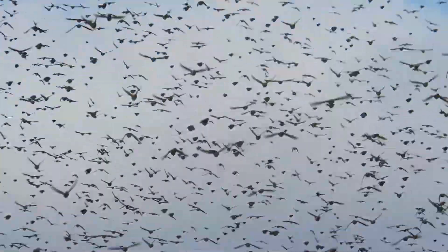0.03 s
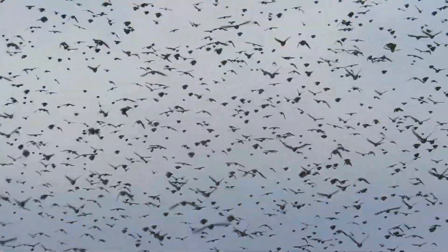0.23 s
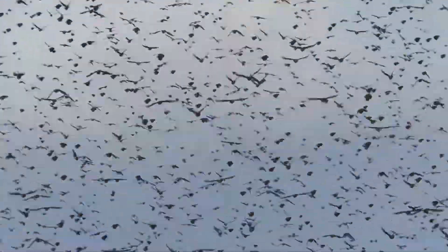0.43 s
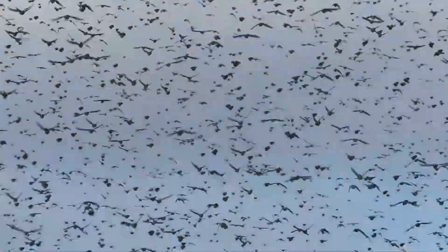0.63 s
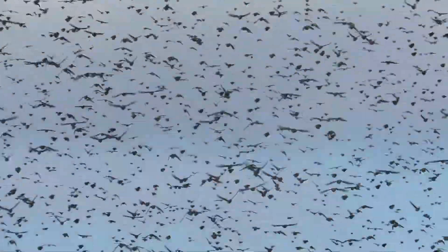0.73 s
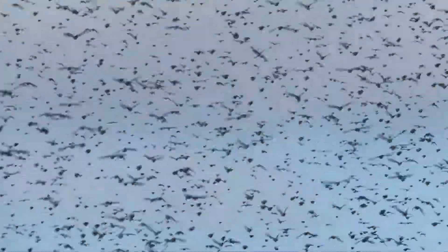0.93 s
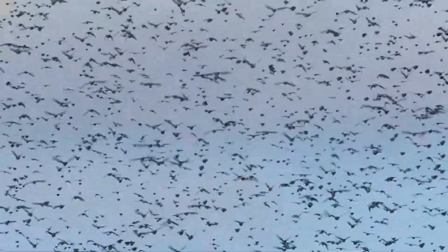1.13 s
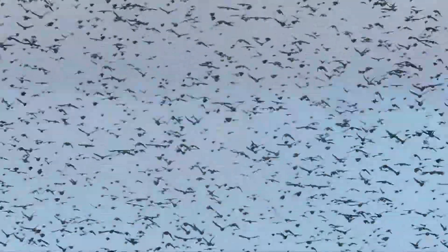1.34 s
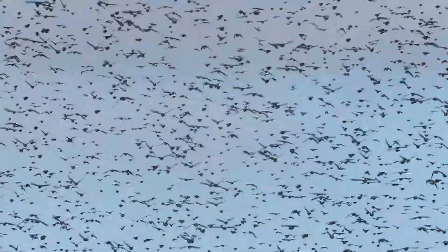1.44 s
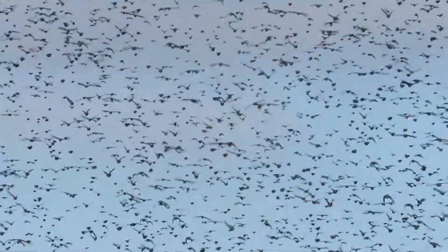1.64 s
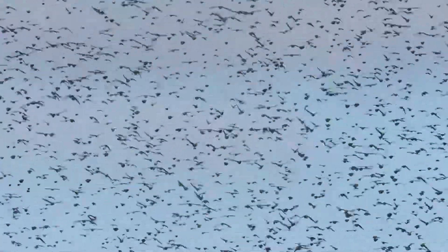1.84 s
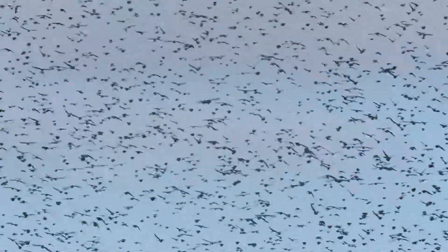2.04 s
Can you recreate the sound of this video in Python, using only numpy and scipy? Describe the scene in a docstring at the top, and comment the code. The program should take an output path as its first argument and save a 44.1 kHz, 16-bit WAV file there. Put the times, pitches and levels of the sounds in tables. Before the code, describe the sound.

Countless bird wings make a continuous rush in the open sky. Wind buffets the microphone almost at once and hits hardest midway. Thin, faint chirps and several close wing swishes come through before the wind dies down.

```python
"""A huge flock of starlings streams overhead, its countless wings blending into a soft rush.
Almost at once, gusts of wind start to rumble and thump on the microphone's two openings (ports).
From 0.65 s come three thin chirps, and from 0.8 s five airy swishes pass close by.
Near 1 s the hardest thumps make the limiter turn everything down, and the level creeps back.
A small tick sounds in the fourth swish; then the wind dies away while the flock rushes on."""
import sys
import numpy as np
from scipy import signal
from scipy.fft import rfft, irfft
from scipy.io import wavfile
from scipy.ndimage import uniform_filter1d

SR = 44100
rng = np.random.default_rng(int(sys.argv[2]) if len(sys.argv) > 2 else 0)


def unload_audio(sound):
    """Save the sound as a 16-bit wav file, at the path given as the first command line argument."""
    columns = np.transpose(np.atleast_2d(sound))
    # keep every value between -1 and 1, then stretch to whole-number steps
    steps = np.round(np.clip(columns, -1, 1) * 32767)
    wavfile.write(sys.argv[1], SR, steps.astype(np.int16))


N = 92610
T = np.arange(N) / SR

# Tone colour of all the wings together: pitch_hz, level_db
RUSH_COLOUR = [(25, -18), (85, 8.5), (200, 2), (400, -12.5), (600, -4), (750, -2), (930, 1), (1080, -6.5),
               (1250, -10.5), (1700, -15), (2500, -21), (3500, -17.5), (4300, -25), (5200, -28.5),
               (8000, -34.5), (11000, -39.5), (14000, -51)]
# How alike left and right are in the rush (1 same, 0 unrelated, -1 opposite): pitch_hz, likeness
RUSH_LIKENESS = [(60, 1), (200, 0.95), (380, .45), (700, .85), (1100, .92), (1700, 0.74), (2600, 0.29),
                 (5000, 0.038), (12000, 0)]
# How the rush changes: time_s, level_db, extra_treble_db, extra_bass_db
RUSH_CHANGES = [(0, -42.5, 0, -5), (.25, -46, 2.5, 1.5), (.5, -43.5, 1.5, 5), (0.898, -42.5, 0.5, 0.5),
                (1.2, -42, 0, -0.5), (1.599, -44, 2, -5.5), (1.9, -41.5, -1, 0), (2.1, -42, 0, -4.5)]
# Close swishes: peak_s, level_db, rise_s, fall_s, brightness_db_per_octave
CLOSE_SWISHES = [(.785, -48.5, 0.036, 0.022, -7), (.955, -44, 0.03, 0.023, 0),
                 (1.157, -40, 0.025, 0.028, 0), (1.37, -39.5, 0.046, .033, 0),
                 (1.555, -41.5, 0.046, 0.024, -2.5)]
# Tone colour of a swish: pitch_hz, level_db
SWISH_COLOUR = [(60, -59.5), (300, -31.5), (900, -3), (1400, 3.5), (1700, 0), (1980, 3.5), (2300, 2.5),
                (2800, -10), (3600, -9), (4500, -20.5), (6500, -27), (14000, -53.5)]
# How alike left and right are in a swish: pitch_hz, likeness
SWISH_LIKENESS = [(1000, .95), (2000, 0.87), (3000, 0.81), (5000, .3)]
# Wind at the microphone: time_s, level_db, rumble_centre_hz
WIND_GUSTS = [(0, -55, 200), (.13, -57, 183), (.18, -30.5, 160), (0.213, -44, 167), (0.248, -13, 227),
              (0.301, -12.5, 270), (.335, -19, 231.6), (0.359, -46.5, 220), (0.442, -35.5, 180),
              (0.462, -19.5, 245), (0.489, -17, 246), (0.514, -37.5, 200), (.55, -18.5, 181),
              (0.578, -32.5, 200), (.64, -30, 200), (0.682, -25, 245), (0.704, -51, 170),
              (0.729, -34.5, 191), (0.748, -16.5, 259), (0.809, -17.5, 180), (.845, -23.5, 170),
              (.885, -17, 180), (0.916, -14, 175), (.94, -27, 165), (.98, -15.5, 230), (1.02, -13, 263),
              (1.054, -3.5, 304), (1.086, -15, 310), (1.104, -3, 370), (1.128, -19, 284),
              (1.155, -17.5, 263), (1.2, -36, 220), (1.272, -32.5, 250), (1.36, -31, 260), (1.39, -39, 220),
              (1.42, -29.5, 197), (1.469, -26, 300), (1.5, -32.5, 288), (1.538, -27.5, 240),
              (1.61, -35.5, 238), (1.69, -31, 209), (1.772, -33, 176), (1.818, -48.5, 187),
              (1.93, -45, 206.3), (2.01, -53, 179), (2.069, -24, 172), (2.1, -46, 160)]
# Tone colour of the rumble when centred on RUMBLE_CENTRE_HZ: pitch_hz, level_db
RUMBLE_COLOUR = [(25, -34), (55, -28), (90, -12.5), (140, -1), (210, 5), (320, -1), (450, -4), (700, -17.5),
                 (1000, -38), (1600, -44.5), (4000, -65), (16000, -93.5)]
RUMBLE_CENTRE_HZ = 255.7
# How the ports boost or cut the wind: pitch_hz, gain_db
PORT_COLOUR = [(25, -18), (55, -2), (120, 0.5), (300, 0.5), (450, 4), (550, -4.5), (640, 0.5), (1000, 0.5),
               (1600, -5)]
# How alike left and right are in the wind: pitch_hz, likeness
WIND_LIKENESS = [(40, 0.8), (100, 0.98), (170, 0.43), (260, -0.093), (500, -0.53), (780, -0.61),
                 (1200, -0.5)]
# Swirls of air hitting the ports: time_s, peak_db, pitch_hz, left_over_right_db, right_delay_s
AIR_SWIRLS = [(.246, -6.5, 221, 6.5, .0006), (.292, 0.5, 360, 5.5, 0.001), (.460, -13.5, 303, -1.5, 0.0008),
              (0.488, -5, 265, -4, 0.0011), (.676, -10, 270, 0, 0.0013), (.747, -3.5, 288, 0.5, 0.0011),
              (0.9971, 8, 310, 0, 0.00067), (1.004, 4, 397, 8, 0.00059), (1.036, -5, 300, 0.5, .0006),
              (1.063, 1.5, 380, -6, 0.00079), (1.467, -10, 310, -0.5, 0.00036),
              (1.477, -11.5, 326, -1, .0004), (1.517, -13.5, 248, -1, 0.00018),
              (1.92, -26, 260, 2, 0.00017), (1.972, -28.5, 240, 2, 0.00028)]
# Ringing notes of the tick: pitch_hz, level_db, ring_s (time to fade by 60 dB)
TICK_NOTES = [(1050, -29, 0.018), (1290, -23.5, 0.018), (1520, -34, 0.017), (2090, -32.5, 0.027),
              (2600, -36, 0.037)]
# Nearer chirps: start_s, length_s, top_pitch_hz, level_db
NEAR_CHIRPS = [(0.651, .026, 4600, -57), (.694, 0.046, 4600, -58.5), (0.813, .025, 3950, -59.5)]
# Faint tones far away: pitch_hz, level_db
FAR_TONES = [(1029, -54.5), (914, -57)]


def flock(group_count=40, flaps_per_s=13, flutter_db=1.0, treble_hz=1480, bass_hz=493):
    """Distant wings make a rush; each group of birds flutters one band of it at its own pace."""
    times, level_db, treble_db, bass_db = np.transpose(RUSH_CHANGES)
    groups = rng.random((group_count, 3))

    def colour_db(t, hz):
        octave = np.log2((hz + 1) / treble_hz)
        flutter = 0
        for place, pace, phase in groups:
            beat = np.sin(2 * np.pi * (flaps_per_s * (.5 + pace) * t + phase))
            band = np.exp(-((octave - 6 * (place - .5)) / .35) ** 2)
            flutter = flutter + beat * band
        treble = np.interp(t, times, treble_db) * np.clip(octave + .5, 0, 1)
        bass = np.interp(t, times, bass_db) / (1 + (hz / bass_hz) ** 4)
        return look_up(RUSH_COLOUR, hz) + treble + bass + flutter_db * unit(flutter)
    return noise(colour_db, RUSH_LIKENESS) * amp(np.interp(T, times, level_db))


def swishes():
    """Airy hiss swells and fades close by, once for each swish."""
    times, _, _, _, brightness = np.transpose(CLOSE_SWISHES)

    def colour_db(t, hz):
        return look_up(SWISH_COLOUR, hz) + np.interp(t, times, brightness) * np.log2(hz / 2000 + 0.19)
    swells = sum(amp(db) * bell((T - peak) / np.where(T < peak, rise, fall))
                 for peak, db, rise, fall, _ in CLOSE_SWISHES)
    return noise(colour_db, SWISH_LIKENESS) * swells


def wind(lump_db=4.5, lump_s=0.006, settle_s=0.015, width_db=-10, strong_gust_db=-23):
    """Churning air rumbles; light air reaches both ports much alike, strong gusts hit each its own way."""
    times, level_db, centre_hz = np.transpose(WIND_GUSTS)
    gust_db = np.interp(T, times, level_db)

    def colour_db(t, hz):
        return look_up(RUMBLE_COLOUR, hz * RUMBLE_CENTRE_HZ / np.interp(t, times, centre_hz))
    air = noise(colour_db, WIND_LIKENESS) * amp(lump_db * wobble(lump_s))
    width = amp(width_db / (1.5 + np.exp((gust_db - strong_gust_db) / 2)))
    middle = air.mean(0)
    air = middle + width * (air - middle)
    # Even out slow swells, so that the gusts set the level.
    strength = np.sqrt(np.abs(smooth((air ** 2).mean(0), settle_s)) + 1e-9)
    air = air / strength * amp(gust_db)
    port_gain = amp(look_up(PORT_COLOUR, np.fft.rfftfreq(2 * N, 1 / SR)))
    return irfft(rfft(air, 2 * N) * port_gain)[:, :N]


def thumps(width_cycles=0.5, knock_hz=1092, knock_db=-36.5, knock_s=0.0012, knock_growth=2.95):
    """Each swirl of air sucks briefly at the left port, then the right; the hardest also knock."""
    out = np.zeros((2, N))
    for time, db, hz, pan_db, delay in AIR_SWIRLS:
        t = T - time - np.array([[0], [delay]])
        suck = -np.cos(2 * np.pi * hz * t) * bell(hz * t / width_cycles)
        knock = np.sin(2 * np.pi * knock_hz * t) * bell(t / knock_s)
        pan = amp(pan_db * np.array([[.5], [-.5]]))
        out += pan * (amp(db) * suck + amp(knock_growth * db + knock_db) * knock)
    return out


def tick(start_s=1.38, rise_s=0.00049):
    """One small dry tick close by: a few notes that die away fast."""
    t = np.maximum(T - start_s, 0)
    ring = sum(amp(db - 60 * t / ring_s) * np.sin(2 * np.pi * (hz * t + rng.random()))
               for hz, db, ring_s in TICK_NOTES)
    return ring * np.minimum(t / rise_s, 1)


def chirp(start_s, length_s, top_hz, db, sweep=0.22, top_at=0.55, roughness=.018):
    """A thin, slightly rough whistle that slides up and bends back down."""
    progress = np.clip((T - start_s) / length_s, 0, 1)
    jitter = roughness * unit(uniform_filter1d(rng.standard_normal(N), size=40))
    hz = top_hz * (1 + jitter - sweep * (1 - progress / top_at) ** 2)
    return amp(db) * np.sin(np.pi * progress) * sine(hz)


def bird_calls(count=40, chatter_db=-63, low_hz=3060, high_hz=4260, typical_s=0.024):
    """A few nearer chirps over faint chatter from all sides."""
    out = np.zeros((2, N)) + sum(chirp(*row) for row in NEAR_CHIRPS)
    for when, pitch, size, side in rng.random((count, 4)):
        top_hz = low_hz + pitch * (high_hz - low_hz)
        call = chirp(when * N / SR, typical_s * (.5 + size), top_hz, chatter_db)
        out += np.sqrt([[side], [1 - side]]) * call
    return out


def far_tones(waver_hz=9):
    """Faint wavering tones in the distance."""
    return sum(amp(db) * unit(sine(hz + waver_hz * wobble(0.037))) for hz, db in FAR_TONES)


def amp(db):
    """Turns decibels into a gain."""
    return 10 ** (np.asarray(db) / 20)


def unit(x):
    """Scales a signal to an average strength (rms) of 1."""
    return x / np.sqrt(np.mean(x ** 2) + 1e-20)


def bell(x):
    """A smooth hump, highest at x = 0."""
    return np.exp(-.5 * x ** 2)


def sine(hz):
    """A pure tone that follows a changing pitch."""
    return np.sin(2 * np.pi * np.cumsum(hz) / SR)


def look_up(table, hz):
    """Reads a table at any pitch, gliding between its rows."""
    pitches, values = np.transpose(table)
    return np.interp(np.log(hz + 1), np.log(np.abs(pitches) + 1), values)


def smooth(x, seconds):
    """Blurs a signal over time with a bell-shaped average."""
    gain = bell(np.fft.rfftfreq(2 * N, 1 / SR) * np.pi * seconds)
    mirrored = np.concatenate([x, x[..., ::-1]], -1)
    return irfft(rfft(mirrored) * gain)[..., :N]


def wobble(seconds):
    """A smooth random drift of strength 1."""
    return unit(smooth(rng.standard_normal(N), seconds))


def noise(colour_db, likeness_table, size=1024):
    """Stereo noise of strength 1, shaped over time and pitch by colour_db(t, hz)."""
    hop = size // 4
    t = np.arange(N // hop + 5)[:, None] * hop / SR
    hz = np.fft.rfftfreq(size, 1 / SR)
    a, b, c, d = rng.standard_normal((4, len(t), len(hz)))
    likeness = np.clip(look_up(likeness_table, hz), -1, 1)
    left = a + 1j * b
    right = likeness * left + np.sqrt(1 - likeness ** 2) * (c + 1j * d)
    spectrum = np.array([left, right]) * amp(colour_db(t, hz))
    _, sound = signal.istft(spectrum.transpose(0, 2, 1), nperseg=size, noverlap=size - hop)
    return unit(sound[:, :N])


def scene():
    """The birds, the other small sounds and the wind together."""
    return flock() + bird_calls() + far_tones() + swishes() + tick() + wind() + thumps()


def record(dry, ceiling_db=-1.4, recover_db_per_s=7, attack_s=0.0014, cutoff_hz=13600):
    """A limiter turns loud moments down fast and recovers slowly; the highest treble is cut."""
    over_db = np.maximum(20 * np.log10(abs(dry).max(0) + 1e-9) - ceiling_db, 0)
    recovery_db = T * recover_db_per_s
    cut_db = smooth(np.maximum.accumulate(over_db + recovery_db) - recovery_db, attack_s)
    limited = dry * amp(-cut_db)
    clipped = limited / (1 + limited ** 8) ** (1 / 8)  # rounds off peaks that slip through
    low_pass = signal.firwin(255, cutoff_hz, window=("kaiser", 8), fs=SR)
    return signal.oaconvolve(clipped, low_pass[None], "same")


dry = scene()
out = record(dry)
unload_audio(out)
```